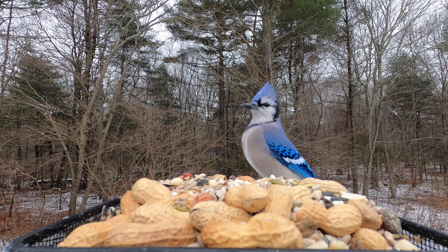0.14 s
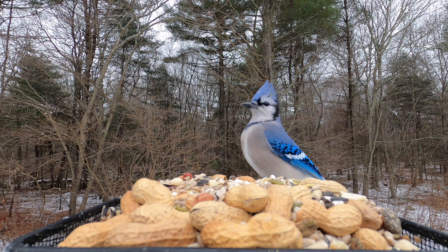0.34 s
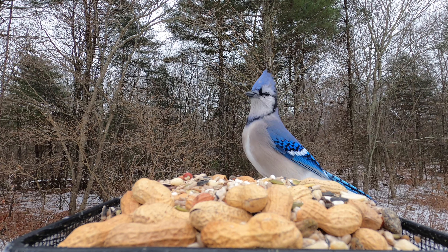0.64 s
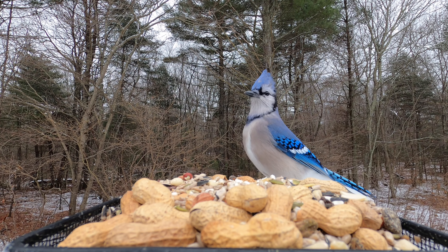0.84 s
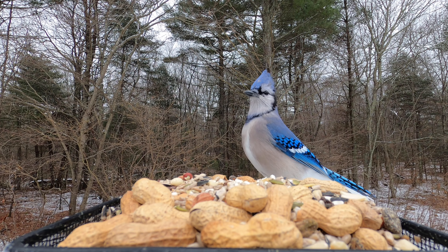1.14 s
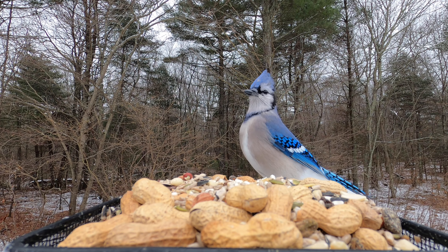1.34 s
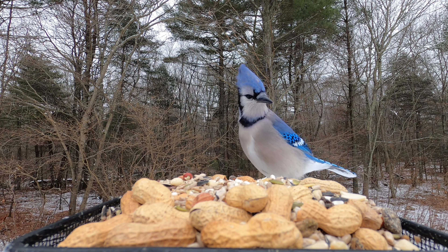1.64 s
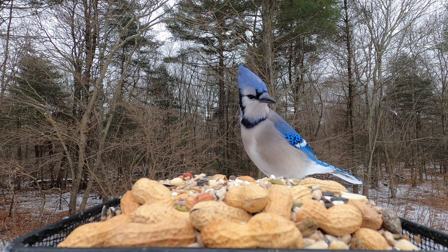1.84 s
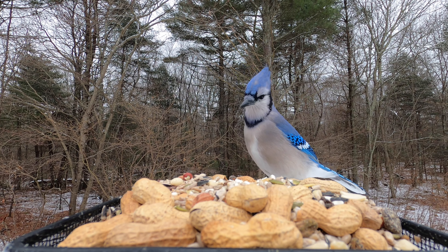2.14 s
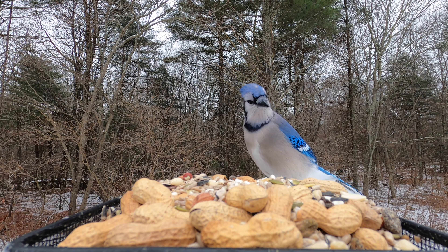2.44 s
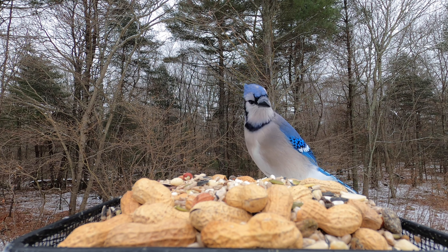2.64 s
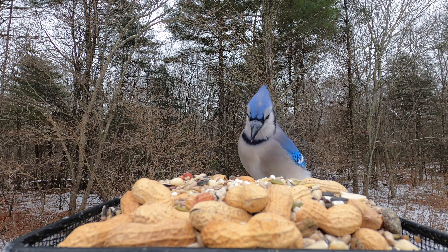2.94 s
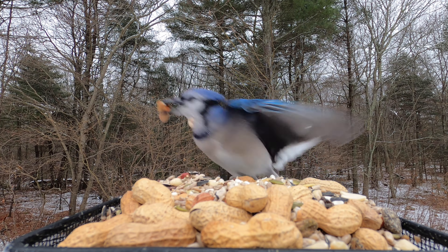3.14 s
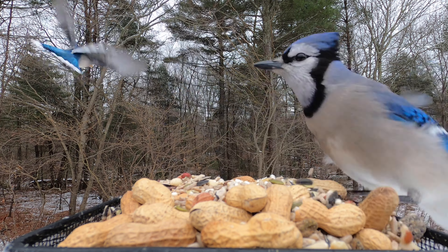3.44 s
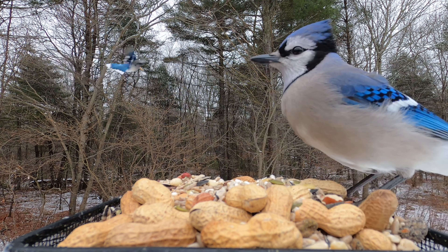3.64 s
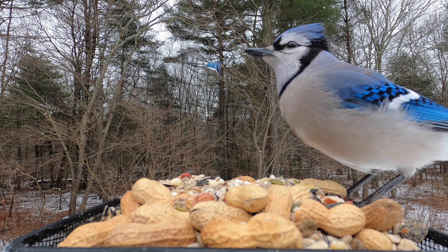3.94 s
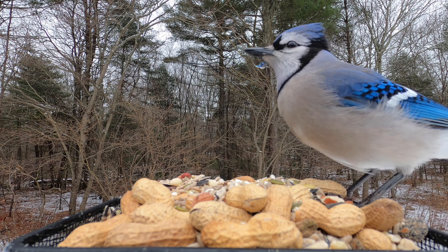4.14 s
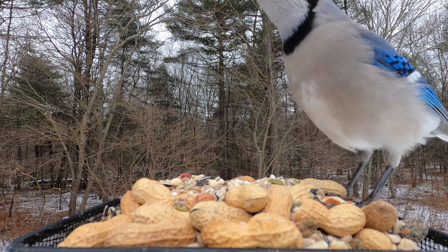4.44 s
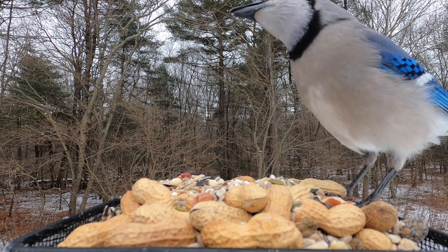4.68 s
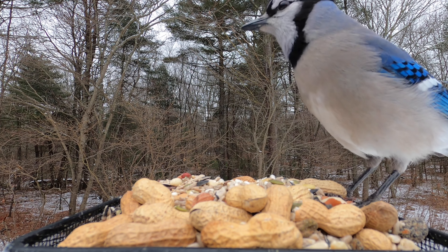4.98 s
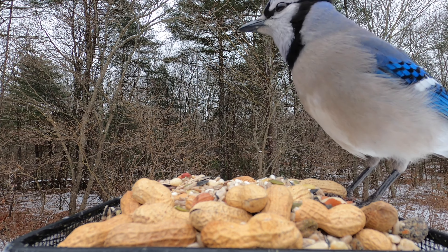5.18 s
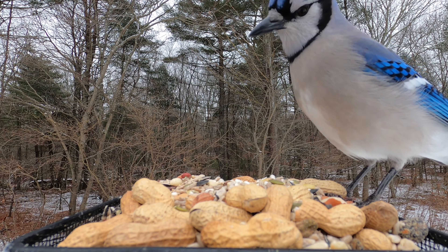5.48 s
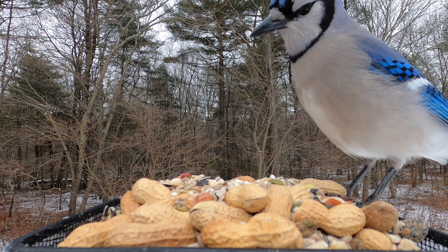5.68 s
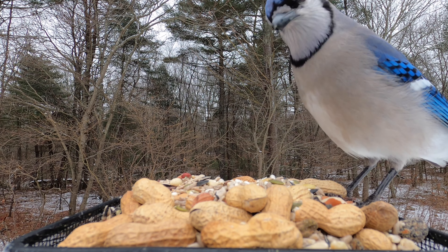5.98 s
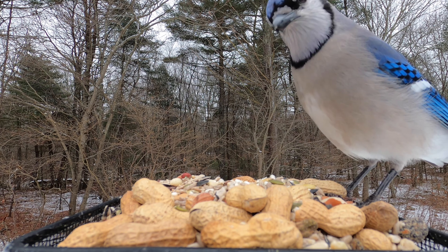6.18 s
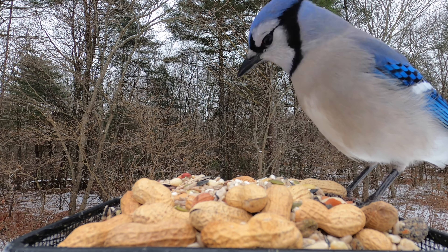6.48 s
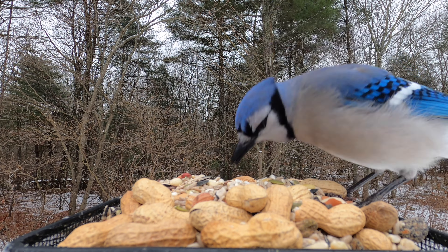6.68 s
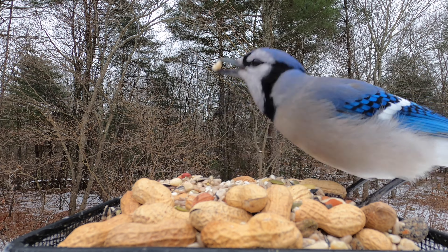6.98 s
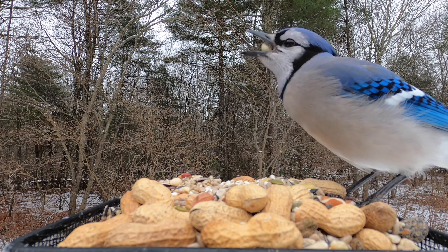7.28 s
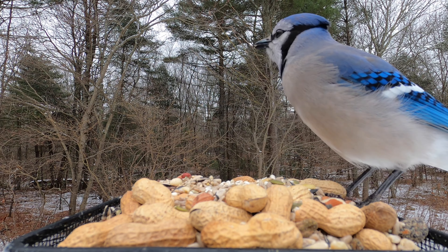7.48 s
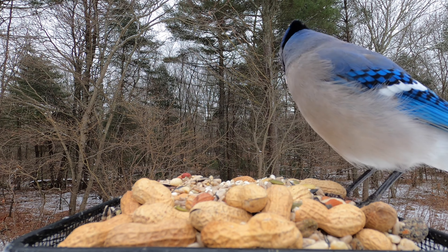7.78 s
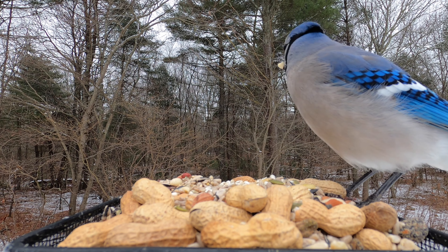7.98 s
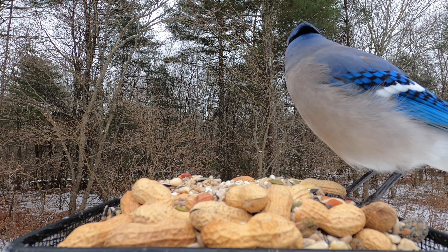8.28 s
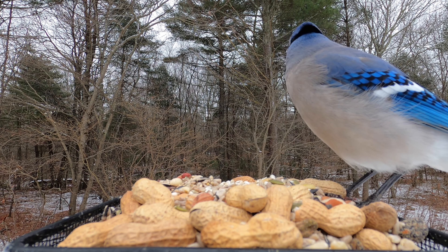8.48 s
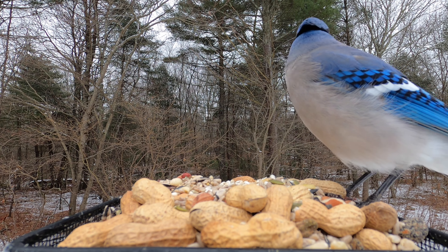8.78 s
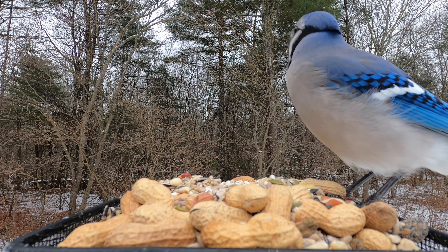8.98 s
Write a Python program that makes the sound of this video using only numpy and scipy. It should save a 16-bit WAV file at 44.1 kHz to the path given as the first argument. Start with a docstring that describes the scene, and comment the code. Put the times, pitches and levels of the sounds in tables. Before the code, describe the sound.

Low gusts from a bird's wings hit the microphone at a feeder in the woods, with a brief rattle of nuts. Thin high chips, faint whistles and a nuthatch's nasal notes come from the trees. Then feathers swish close by, nuts clatter and a blue jay lands heavily on the tray. It lets out a loud, short creak that jumps in pitch, then pecks lightly among the nuts.

```python
"""A blue jay on a feeder tray in winter woods, a hand's length from the microphone.
One jay takes off: its wings blow on the microphone ports and the nuts rattle. Small birds and a
nuthatch call among the trees over a faint rumble. Near 3 s another jay flutters in and lands, ringing
the tray. At 4.4 s it gives a loud creaking call, its syrinx jumping between registers and breaking
into rasp. Then it pecks at the nuts while the far birds call on."""
import sys
import numpy as np
from scipy import signal
from scipy.fft import rfft, irfft, next_fast_len
from scipy.io import wavfile
from scipy.ndimage import uniform_filter1d

SR = 44100
rng = np.random.default_rng(int(sys.argv[2]) if len(sys.argv) > 2 else 0)


def transcribe(signal):
    """Save signal, clipped to [-1, 1], as a 16-bit WAV file at the path in sys.argv[1]."""
    frames = np.atleast_2d(signal).T
    limited = np.clip(frames, -1, 1)
    pcm = np.round(limited * 32767).astype(np.int16)
    wavfile.write(sys.argv[1], SR, pcm)


N = 402191
T = np.arange(N) / SR

# spectrum of nuts and seed: freq_hz, gain_db
NUT_SPECTRUM = [(350, -10.5), (600, -13.5), (1000, -9), (1100, -6), (1260, 2), (1630, -5), (2340, -10.5),
                (3020, -10.5), (3900, -10.5), (6510, -18), (15000, -44)]
# the jay's weight hitting the tray: start_s, level_db
LANDING = [(3.419, -15.5), (3.4211, -16), (3.427, -20.5)]


def undb(db):
    """Decibels to gain."""
    return 10 ** (np.asarray(db) / 20)


def colour(x, spectrum):
    """Filter by (freq_hz, gain_db) points; white noise keeps its power."""
    hz, db = np.transpose(spectrum)
    size = next_fast_len(N + SR)
    bins_hz = np.maximum(np.fft.rfftfreq(size, 1 / SR), 1)
    gain = undb(np.interp(np.log(bins_hz), np.log(hz), db))
    return irfft(rfft(x, size) * gain / np.sqrt(np.mean(gain ** 2)), size)[..., :N]


def noise(spectrum, flutter_db=0):
    """Coloured noise of rms 1, its level following flutter_db."""
    x = colour(rng.standard_normal(N) * undb(flutter_db), spectrum)
    return x / x.std()


def walk(rate_hz):
    """Smooth random curve of unit spread."""
    step = max(int(SR / rate_hz), 2)
    x = uniform_filter1d(np.repeat(rng.standard_normal(N // step + 1), step)[:N], step)
    return x / x.std()


def ports(spectrum, apart):
    """Noise at two ports; apart is the uncorrelated share of power."""
    common = np.sqrt(1 - apart) * noise(spectrum)
    return common + np.sqrt(apart) * np.array([noise(spectrum), noise(spectrum)])


def swell(onset_s, attack_s, hold_s, release_s, t=T):
    """Gain that reaches 1 at onset_s, holds and decays; attack and release are time constants."""
    rise = (t - onset_s) / attack_s
    fall = (onset_s + hold_s - t) / release_s
    return np.exp(np.clip(np.minimum(rise, fall), -30, 0))


def add(track, start_s, x):
    """Mix a short sound into a track."""
    i = max(int(start_s * SR), 0)
    track[i:i + len(x)] += x[:max(N - i, 0)]


def tone(pitch_hz, harmonics_db, overtones_db=0):
    """Syrinx tone on a moving pitch; overtones_db shifts all harmonics but the first."""
    phase = 2 * np.pi * np.cumsum(pitch_hz) / SR
    return np.sqrt(2) * sum(undb(db + overtones_db * (k > 1)) * np.sin(k * phase)
                            for k, db in enumerate(harmonics_db, 1))


def woods(trim_db=6.5):
    """Faint, wavering rumble of far-off air and traffic."""
    # rumble spectrum: freq_hz, gain_db
    spectrum = [(20, -5), (42, -6.5), (65, -11), (95, -18), (170, -12.5), (310, -21), (420, -20.5),
                (540, -30.5), (1050, -31), (2000, -36), (3000, -47.5), (5500, -48.5), (7400, -46.5),
                (9000, -59), (15000, -68.5)]
    # slow drift: time_s, level_db
    drift = [(0, -65.5), (1.7, -67), (2.7, -66), (4.7, -68), (6.8, -64.5), (9.1, -63.5)]
    level_db = np.interp(T, *np.transpose(drift))
    return ports(spectrum, apart=.02) * undb(level_db + trim_db + .9 * walk(3))


def wing_wind(ceiling=.55):
    """Wings push pressure waves and eddies at both ports and blast the right one; a hop thumps low before the
    flight; peaks overload."""
    # stirred air, and a low thump as the bird hops near 3 s: onset_s, hold_s, release_s, level_db, eddy_db
    draughts = [(0, 0.062, 0.073, -22, -3.5), (2.96, .03, .03, -50, -3.5), (3.197, 0.07, .05, -31.5, -12),
                (3.307, 0.2, 0.099, -27, -18), (3.569, 0.074, 0.053, -21, -0.5),
                (3.743, 0.068, 0.1, -27, -18.5), (4.353, 0.0041, 0.028, -42, -9.5)]
    # direct hits of air: onset_s, hold_s, level_db
    blasts = [(.002, .022, -13), (.045, 0.0045, -13), (3.576, .011, -9), (3.627, 0.0026, -20),
              (3.667, .001, -24.5)]
    # spectra of the three flows: freq_hz, gain_db
    wave_spectrum = [(11, -16.5), (18, 3), (46, 4), (88, -12.5), (273, -31.5), (300, -31.5), (390, -46),
                     (660, -120)]
    eddy_spectrum = [(60, -16.5), (115, 5.5), (200, -9.5), (330, -17.5), (700, -43), (2000, -71)]
    blast_spectrum = [(80, -35.5), (150, 2.5), (330, 2), (550, -9.5), (1000, -18), (1500, -36.5),
                      (2500, -50.5), (5000, -68.5)]
    waves = ports(wave_spectrum, apart=.22)
    eddies = ports(eddy_spectrum, apart=.6)
    blast = noise(blast_spectrum, .44 * walk(130))
    wave_gain, eddy_gain = np.zeros(N), np.zeros(N)
    for onset_s, hold_s, release_s, level_db, eddy_db in draughts:
        gust = undb(level_db) * swell(onset_s, .018, hold_s, release_s)
        wave_gain = np.maximum(wave_gain, gust)
        eddy_gain = np.maximum(eddy_gain, gust * undb(eddy_db))
    out = waves * wave_gain + eddies * eddy_gain
    out[1] += blast * sum(undb(db) * swell(onset_s, .0041, hold_s, .0086)
                          for onset_s, hold_s, db in blasts)
    return ceiling * np.tanh(out / ceiling)


def nuts(settle_db=-17, settle_s=.02, trim_db=-4, split_hz=4500):
    """Each touch is a dry tick or scuff, then a short grainy clatter of shells."""
    # feet and bill on the nuts: start_s, level_db, treble_db, contact_s
    knocks = [(0.012, -37, -9, .0014), (0.0297, -33.5, -20, 0.00089), (0.598, -55, -2.5, 0.027),
              (2.967, -42.5, -18, .002), (3.02, -33, -12, 0.00058), (3.0913, -38.5, -8, 0.0032),
              (3.112, -29.5, -5, 0.014), (3.1418, -27.5, -7.5, 0.0016), (3.16, -29, -11, 0.0012),
              (3.252, -37, -12, .004), (3.418, -23, -13, 0.011), (3.5095, -38.5, -6, 0.0018),
              (3.5586, -40.5, -2, .0014), (6.772, -46.5, 6.5, 0.0014), (6.777, -33, -13, .0014),
              (6.81, -39.5, -5, 0.0012), (6.9125, -42.5, -12, .0025), (6.927, -46, -6, 0.0019),
              (7.137, -41, -4.5, 0.0015), (7.152, -43.5, -4, 0.0021), (7.253, -44, -4.5, .0014),
              (8.979, -41, -11, 0.0046)]
    t = T[:SR // 8]
    settling = undb(settle_db) * np.exp(-t / settle_s)
    give = 1 - np.exp(-t / .0004)  # the shell yields a little
    body, bright = np.zeros(N), np.zeros(N)
    for start_s, level_db, treble_db, contact_s in knocks:
        grains = rng.standard_normal(len(t))
        grains *= undb(3 * np.repeat(rng.standard_normal(len(t)), 40)[:len(t)])
        hit = undb(level_db + trim_db) * grains * (np.exp(-t / contact_s) + settling) * give
        add(body, start_s, hit)
        add(bright, start_s, hit * undb(treble_db + 8.5))
    lowpass = signal.butter(2, split_hz, fs=SR, output="sos")
    return colour(signal.sosfiltfilt(lowpass, body - bright) + bright, NUT_SPECTRUM)


def chips(length_s=.038, lead_s=.008, trim_db=-5, fizz=.2, skirt_db=-26):
    """A small bird's chip shoots up in pitch, holds a fizzy crest and plunges in a faint tail."""
    # chips: time_s, level_db, pitch_hz
    calls = [(0.0298, -50, 5250), (0.1448, -49, 5190), (0.2528, -55, 4830), (0.4715, -64, 5400),
             (1.195, -53, 5360), (1.4337, -59.5, 5000), (1.707, -53.5, 5240), (1.9577, -62, 4920),
             (2.2164, -51.5, 5270), (2.635, -55, 5090), (3.0347, -46, 5400), (3.468, -47.5, 5430),
             (4.001, -44, 5510), (4.225, -49.5, 5392), (5.0135, -62, 5380), (5.3197, -60.5, 5090),
             (5.7293, -59.5, 5200), (6.0282, -53, 5630), (6.322, -54, 4950), (6.4885, -48, 5290),
             (6.6535, -47.5, 5170), (6.847, -43, 5320), (7.3352, -48.5, 5130), (7.5772, -49.5, 5200),
             (7.7791, -42, 5430), (8.157, -44.5, 5205), (8.3644, -44.5, 5194), (8.5796, -39.5, 5370),
             (8.929, -43.5, 5400)]
    out, wobble = np.zeros(N), walk(600)
    u = np.linspace(-1, 1.35, int(length_s * SR))  # crest at 0
    drop = .5 * np.tanh(.25 * u ** 2 + .12 * u ** 3 + .45 * u ** 4)
    envelope = (np.exp(-(u / .65) ** 4) + undb(skirt_db)) * signal.windows.tukey(len(u), .2)
    for time_s, level_db, pitch_hz in calls:
        jitter = .018 * np.roll(wobble, -int(time_s * SR))[:len(u)]
        voice = tone(pitch_hz * (1.01 - drop + jitter), [0, -34])
        add(out, time_s - lead_s, undb(level_db + trim_db) * envelope * voice)
    return out * (1 + fizz * walk(3000))


def slide(length_s, from_hz, to_hz, bend):
    """A thin note that slides quickly, then levels off."""
    u = np.linspace(0, 1, int(length_s * SR))
    return np.sin(np.pi * u) * tone(to_hz + (from_hz - to_hz) * (1 - u) ** bend, [0])


def whistles(rise_s=.038):
    """Distant birds give short rising whistles and lower, longer falling slurs."""
    # whistles: start_s, top_hz, level_db
    rises = [(.15, 7560, -71.5), (.643, 7670, -67), (1.391, 8740, -71.5), (1.534, 7660, -73.5),
             (1.684, 7600, -70.5), (5.19, 7680, -65), (6.404, 7760, -74), (7.434, 7800, -67.5),
             (8.703, 7600, -74.5)]
    # slurs: start_s, length_s, from_hz, to_hz, level_db
    slurs = [(3.864, 0.066, 2265, 1710, -66.5), (4.045, .17, 3030, 2499, -72),
             (5.634, 0.11, 2410, 1587, -65.5), (6.313, 0.078, 2215, 1370, -64)]
    out = np.zeros(N)
    for start_s, top_hz, level_db in rises:
        add(out, start_s, undb(level_db) * slide(rise_s, .72 * top_hz, top_hz, bend=2.1))
    for start_s, length_s, from_hz, to_hz, level_db in slurs:
        add(out, start_s, undb(level_db) * slide(length_s, from_hz, to_hz, bend=1.3))
    return out


def nuthatch(grain_db=1.5):
    """Nasal, slightly grainy calls whose pitch arches up and falls back."""
    # calls: start_s, length_s, pitch_hz, level_db
    yanks = [(0.256, .14, 546, -62.5), (0.611, 0.15, 553.6, -63), (1.267, 0.19, 548, -64.5),
             (4.968, 0.22, 559, -63.5), (5.363, 0.18, 553.5, -62), (5.958, 0.19, 555.4, -61),
             (7.266, 0.15, 549.3, -59.5), (7.58, .19, 567, -57), (8.094, 0.17, 546, -57.5),
             (8.646, 0.18, 552, -58.5), (9.043, 0.16, 555, -58)]
    # nasal timbre, harmonic 1 upward: level_db
    harmonics_db = [-23, -10, -3.5, -0.5, -12, -22.5]
    out, wobble, grain = np.zeros(N), walk(250), walk(120)
    for start_s, length_s, pitch_hz, level_db in yanks:
        u = np.linspace(-1, 1, int(length_s * SR))
        arch = 1.01 - .19 * np.abs(u) ** 2.3
        jitter = .018 * np.roll(wobble, -int(start_s * SR))[:len(u)]
        voice = tone(pitch_hz * arch * (1 + jitter), harmonics_db)
        add(out, start_s, undb(level_db) * np.sqrt(1 - u ** 2) * voice)
    return out * undb(grain_db * grain)


def feathers(wingbeat_hz=8.2, stroke_db=3, bright_at_db=-45, crackles_per_s=220, trim_db=-3):
    """Feathers swish with the wingbeat, brighter in a strong flurry; seed crackles under them."""
    # flurries of feathers and seed: onset_s, hold_s, level_db
    flurries = [(2.961, 0.018, -58), (3.113, 0.048, -51), (3.209, 0.17, -46.5), (3.424, .01, -43.5),
                (3.495, 0.17, -51.5), (3.72, 0.12, -54), (4.335, .05, -57.5)]
    # feather spectrum: freq_hz, gain_db
    spectrum = [(240, -37.5), (400, -2), (630, -7), (921, -3.5), (1010, -9), (1120, -2.5), (2430, -18.5),
                (3720, -14), (7700, -17.5), (15000, -40.5)]
    envelope = np.max([undb(db) * swell(onset_s, .048, hold_s, .095)
                       for onset_s, hold_s, db in flurries], axis=0)
    flicks_db = 2.5 * walk(45) + 2.5 * walk(600)
    touchdown_s = LANDING[0][0]
    beat_db = stroke_db * np.cos(2 * np.pi * wingbeat_hz * (T - touchdown_s))
    swish = noise(spectrum, flicks_db + beat_db)
    dull = signal.sosfiltfilt(signal.butter(2, 5000, fs=SR, output="sos"), swish)
    brightness = np.sqrt(np.minimum(envelope / undb(bright_at_db), 1))
    swish = dull + (swish - dull) * brightness
    husk = rng.standard_normal(SR // 50) * np.exp(-T[:SR // 50] / .003)
    ticks = rng.standard_normal(N) * (rng.random(N) < crackles_per_s / SR)
    crackle = colour(signal.fftconvolve(ticks, husk)[:N], NUT_SPECTRUM)
    return (swish + undb(-6) * crackle / crackle.std()) * envelope * undb(trim_db)


def tray():
    """The tray rings briefly under the landing feet."""
    # tray modes: freq_hz, level_db, t60_s
    modes = [(360, -7, 0.068), (710, 2, 0.011), (1003, -17, 0.039), (1330, -27, 0.021)]
    out, t = np.zeros(N), T[:SR // 4]
    ring = sum(undb(db - 60 * t / t60_s) * np.sin(2 * np.pi * hz * t) for hz, db, t60_s in modes)
    for start_s, level_db in LANDING:
        add(out, start_s, undb(level_db) * ring)
    return out


def rasp(attack_s=.0056, release_s=.004, roughness_db=3.5):
    """Rough throat noise runs under the jay's call and flares where the voice breaks."""
    # voice breaks: onset_s, hold_s, level_db, hiss_share
    bursts = [(4.393, .004, -38.5, .3), (4.418, .049, -34, 1), (4.43, .003, -29, 1),
              (4.517, 0.0022, -30, 0.04), (4.597, 0.059, -37, 0.16), (4.731, 0.0019, -38, 1),
              (4.771, .005, -39.5, 0.04), (4.85, 0.0099, -36.5, .05), (4.894, 0.0023, -36.5, 0.02),
              (4.91, 0.0016, -27.5, 0.5)]
    # spectra of throat noise and sharp hiss: freq_hz, gain_db
    throat_spectrum = [(880, -35), (1500, -9.5), (1910, -32), (2530, -24.5), (2860, -2.5), (4480, -5),
                       (5100, -10.5), (6630, -18.5), (7990, -30), (8940, -52), (12300, -37.5), (14000, -54)]
    hiss_spectrum = [(290, -62), (500, -27.5), (714, -16.5), (1350, -23.5), (1770, -18), (2530, -22),
                     (3180, -8.5), (4600, -3.5), (6960, -12.5), (8130, -9.5), (8860, -40), (11000, -30),
                     (15000, -52.5)]
    under_call = (4.395, .53, -49, .22)  # same columns as bursts
    throat_power, hiss_power = np.zeros(N), np.zeros(N)
    for onset_s, hold_s, level_db, hiss_share in [under_call, *bursts]:
        power = (undb(level_db) * swell(onset_s, attack_s, hold_s, release_s)) ** 2
        throat_power += power * (1 - hiss_share)
        hiss_power += power * hiss_share
    flutter_db = roughness_db * walk(450)
    throat = np.sqrt(throat_power) * noise(throat_spectrum, flutter_db)
    return throat + np.sqrt(hiss_power) * noise(hiss_spectrum, flutter_db)


def screech(onset_s=4.397, hold_s=.066, level_db=-33, from_hz=3800, to_hz=4730, climb_s=.007):
    """Before it locks into a note, the jay's syrinx climbs and lurches about in pitch."""
    age_s = np.maximum(T - onset_s, 0)
    pitch_hz = to_hz + (from_hz - to_hz) * np.exp(-age_s / climb_s)
    gain = undb(level_db + 3 * walk(710)) * swell(onset_s, .004, hold_s, .004)
    return tone(pitch_hz * (1 + .16 * walk(600)), [0, -24]) * gain


def register(notes, harmonics_db, release_s, jitter, shimmer_db, brighten_db_per_s=0):
    """Notes of one vibration mode of the syrinx: each starts sharp, sags and wavers."""
    scoop, scoop_s, sag_per_s = .023, .0014, .65  # scoop and sag as shares of the pitch
    out, wobble, shimmer = np.zeros(N), walk(700), walk(400)
    for onset_s, attack_s, hold_s, pitch_hz, level_db, overtones_db in notes:
        span = np.arange(int((onset_s - .05) * SR), int((onset_s + hold_s + .1) * SR))
        age_s = np.maximum(T[span] - onset_s, 0)
        bend = 1 + scoop * np.exp(-age_s / scoop_s) - sag_per_s * age_s + jitter * wobble[span]
        bright_db = overtones_db + brighten_db_per_s * np.minimum(age_s, hold_s)
        voice = tone(pitch_hz * bend, harmonics_db, bright_db)
        envelope = swell(onset_s, attack_s, hold_s, release_s, T[span])
        out[span] += voice * undb(level_db + shimmer_db * shimmer[span]) * envelope
    return out


def jay():
    """The creaking call: a screech, then jumps between registers, with rasp at the breaks."""
    # notes by register: onset_s, attack_s, hold_s, pitch_hz, level_db, overtones_db
    low = [(4.525, .0016, .049, 1298, -15, -7.5), (4.791, 0.0068, 0.044, 1265, -17, -1)]
    middle = [(4.675, .008, 0.046, 1945, -35.5, -2)]
    high = [(4.4855, .001, .001, 2875, -30, 0.001), (4.746, .002, .004, 2830, -34, 0.00047)]
    squeaks = [(4.519, .003, .002, 3400, -30, 0), (4.586, .004, 0.0022, 3652, -14, 0.0012),
               (4.847, .004, 0.0025, 3530, -19, 0.0051)]
    hoarse = [(4.51, .008, .012, 1310, -40.5, -6), (4.612, .008, .008, 1098, -42.5, -0.5),
              (4.632, .005, .03, 1402, -43, 1), (4.866, .003, 0.016, 1150, -45, -1.5),
              (4.893, .002, 0.0059, 1372, -35, -12.5), (4.918, .002, .003, 1383, -36.5, 1)]
    notes = register(low, [-1, -16, -11.5, -18.5, -38, -46.5, -59.5],
                     release_s=.004, jitter=.002, shimmer_db=.25, brighten_db_per_s=130)
    notes += register(middle, [-2.5, 16, -2.5, -8.5, -33, -35.5],
                      release_s=.0082, jitter=.004, shimmer_db=1.15)
    notes += register(high, [-2, 7, -9, -21, -39.5], release_s=.014, jitter=.0039, shimmer_db=2.35)
    notes += register(squeaks, [-1, -34.5], release_s=.004, jitter=.014, shimmer_db=4)
    notes += register(hoarse, [1, -12.5, 3.5, -16.5, -14.5],
                      release_s=.0054, jitter=.039, shimmer_db=3.5)
    return screech() + notes + rasp()


def trees(x, wet_db, t60_s, echo_s=.06, echo_db=-20, build_s=.025):
    """Add one distinct echo and a thin scatter from many trunks."""
    t = T[:SR]
    response = rng.standard_normal(SR) ** 3 * undb(-60 * t / t60_s) * (1 - np.exp(-t / build_s))
    response *= undb(wet_db) / np.linalg.norm(response)
    response[int(echo_s * SR)] += undb(echo_db)
    return x + signal.fftconvolve(x, response)[:N]


def scene():
    """Near sounds are almost dry; the farther a bird, the more of the woods it carries."""
    near = trees(jay() + nuts() + tray() + feathers(), wet_db=-43.5, t60_s=1, echo_db=-55.5)
    far = trees(nuthatch(), wet_db=-3, t60_s=.8, echo_s=.045, echo_db=-11)
    far += trees(chips(), wet_db=-16, t60_s=.38, echo_db=-24)
    far += trees(whistles(), wet_db=-1, t60_s=.8)
    return near + far + wing_wind() + woods()


def record(dry):
    """The right port hears everything slightly late; the recorder cuts the top."""
    lag_samples, top_hz = .23, 15700
    left, right = dry
    allpass = [1 - lag_samples, 1 + lag_samples]
    right = signal.lfilter(allpass, allpass[::-1], right)
    lowpass = signal.ellip(8, .2, 80, top_hz, fs=SR, output="sos")
    return signal.sosfilt(lowpass, np.array([left, right]))


dry = scene()
out = record(dry)
transcribe(out)
```